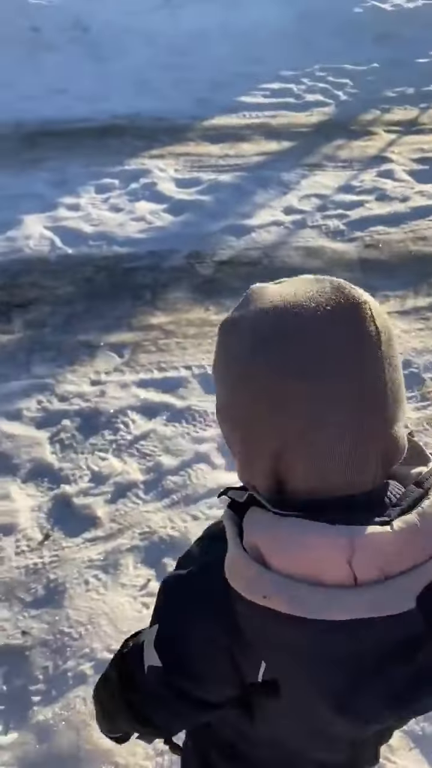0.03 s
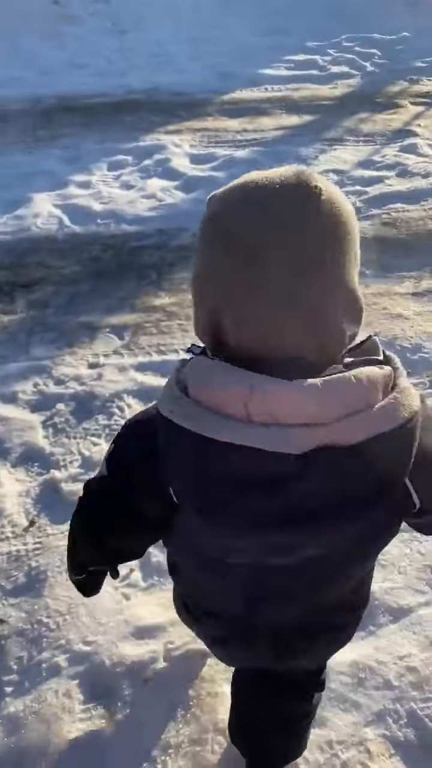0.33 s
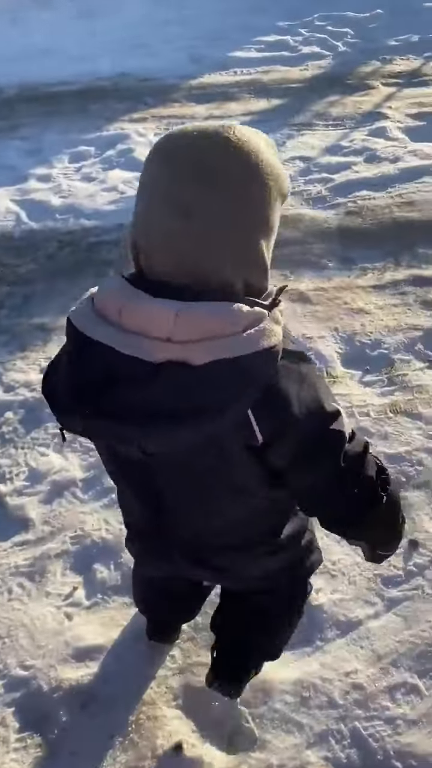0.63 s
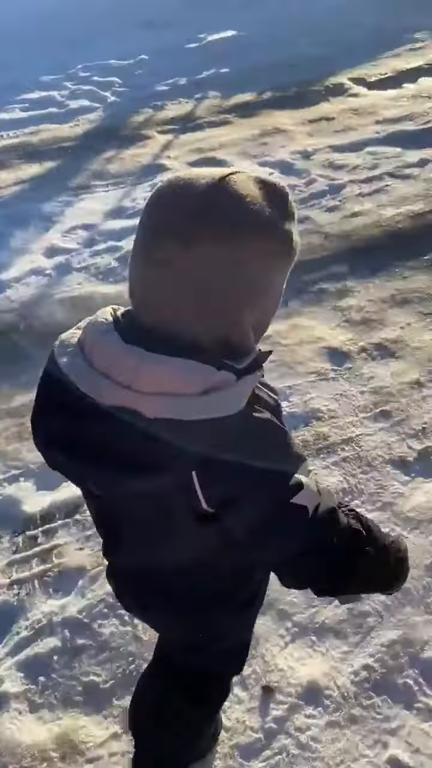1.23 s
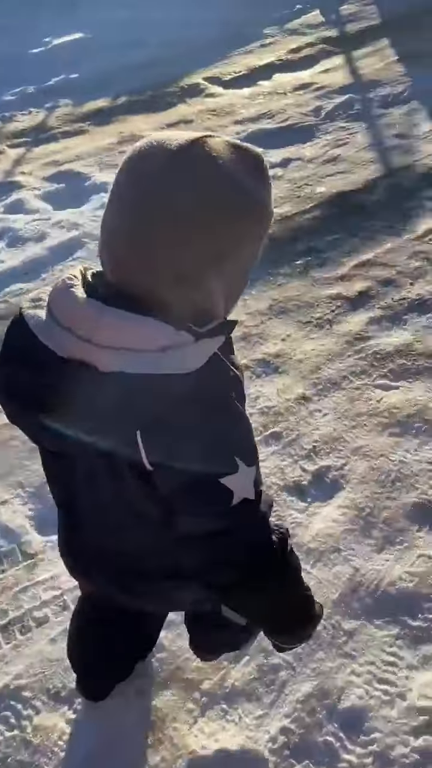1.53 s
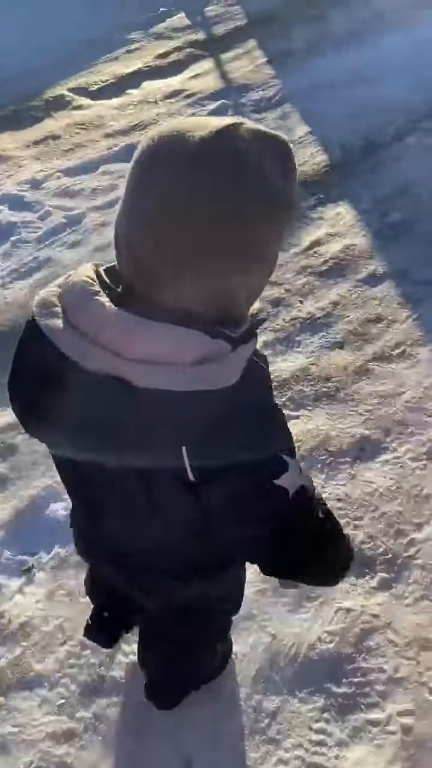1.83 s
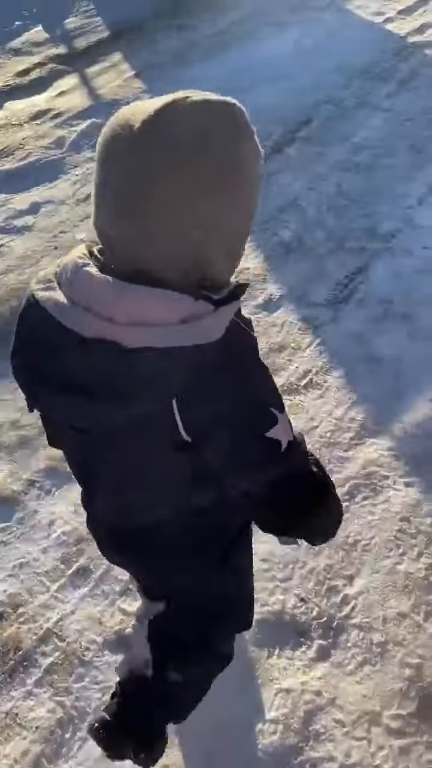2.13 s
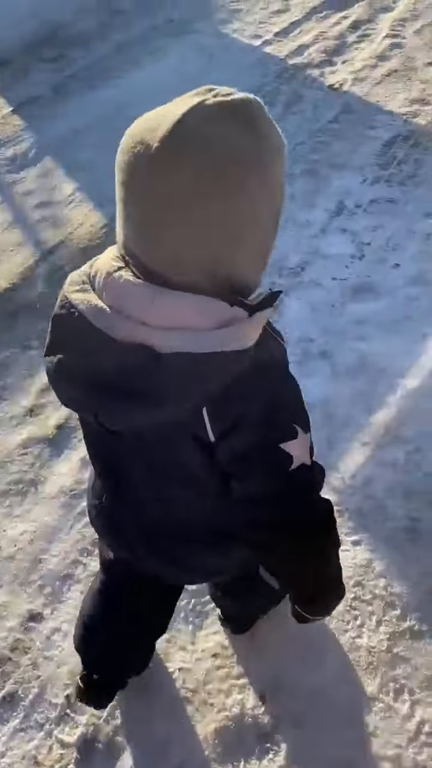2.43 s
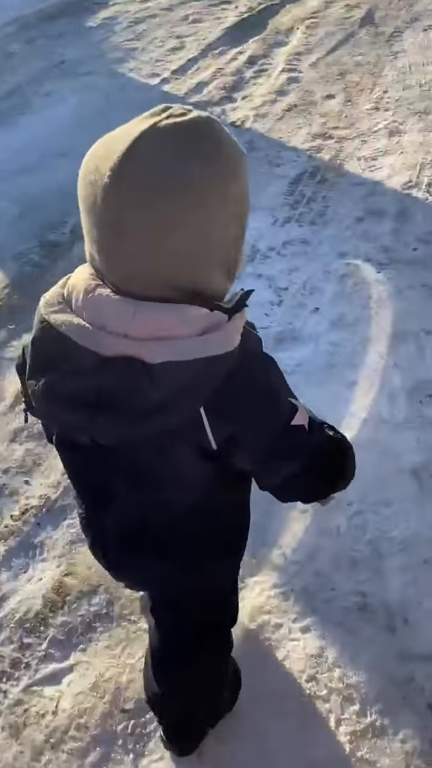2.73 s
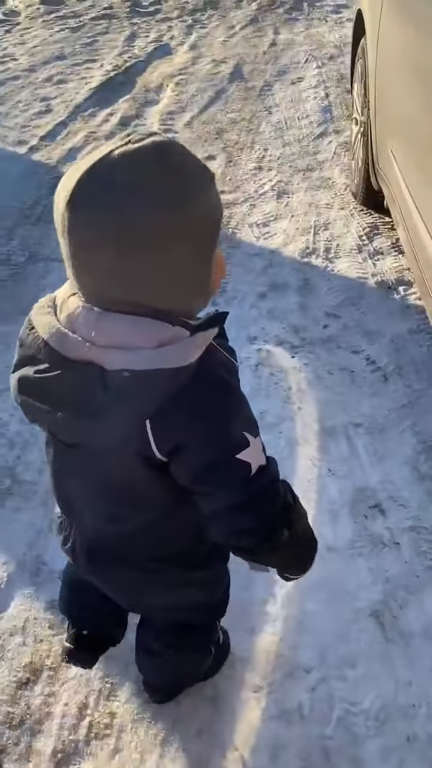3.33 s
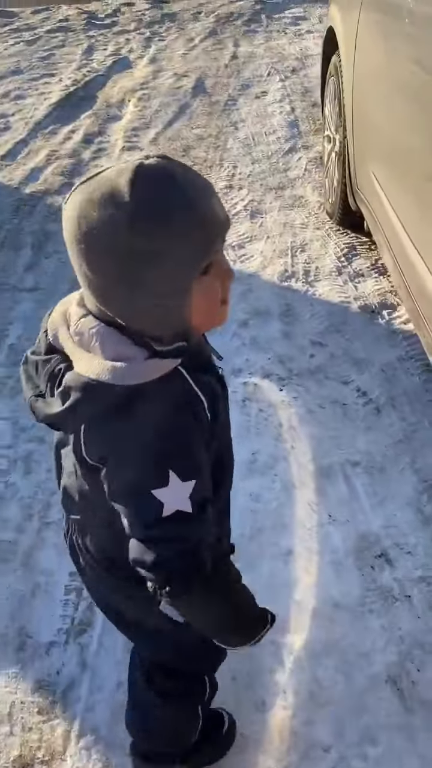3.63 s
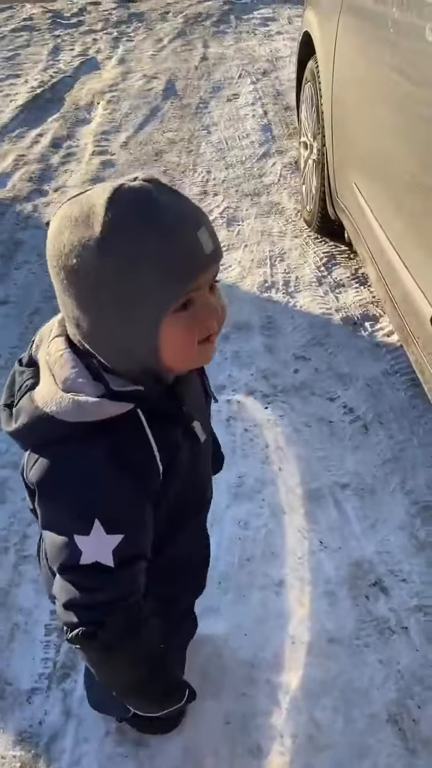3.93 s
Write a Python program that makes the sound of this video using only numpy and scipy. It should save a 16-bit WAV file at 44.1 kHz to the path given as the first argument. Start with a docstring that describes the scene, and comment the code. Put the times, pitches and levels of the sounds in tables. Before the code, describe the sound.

Crunchy, creaky footsteps of a small child on cold snow, with soft clothing rustle.

```python
"""Boots crunch on cold, packed snow: a small child is walking in a padded snowsuit.
Each boot thuds down and crushes grains. The snow creaks as the sole sticks and slips, ice crystals
tick as they shatter, and the icy crust snaps with short falling chirps. The suit swishes as its
fabric rubs. A low hum, like an idling engine, lies under the quiet outdoor air."""
import sys
import numpy as np
from scipy import signal
from scipy.fft import rfft, irfft, next_fast_len
from scipy.io import wavfile

SR = 44100
rng = np.random.default_rng(int(sys.argv[2]) if len(sys.argv) > 2 else 0)


def pcm_store(signal):
    """Save signal as 16-bit PCM."""
    levels = np.round(np.clip(np.atleast_2d(signal), -1, 1) * 32767)
    wavfile.write(sys.argv[1], SR, levels.astype(np.int16).T)


N = 176400
T = np.arange(N) / SR
FFT_SIZE = next_fast_len(N + SR // 4)
HZ = np.maximum(np.arange(FFT_SIZE // 2 + 1) * SR / FFT_SIZE, 1)

# Tone colour of the outdoor air: (frequency [Hz], relative level [dB])
AIR_COLOUR = [(20, -49), (45, 2), (90, -1), (150, -13), (400, -17), (1000, -18), (3000, -25.5), (6000, -54),
              (12000, -39.5)]
# The hum's slow changes: (time [s], pitch [Hz], level [dB])
HUM_PATH = [(0, 64, -56), (.11, 66.7, -43.5), (.8, 66.6, -47), (1, 66.6, -52.5), (1.4, 68.16, -49),
            (2.2, 68.1, -52.5), (2.801, 69.1, -52), (3.4, 69.1, -55), (4, 67.1, -59.5)]
# Tone colour of the rubbing fabric: (frequency [Hz], relative level [dB])
FABRIC_COLOUR = [(200, -24), (800, -6.5), (2000, -1.5), (3000, 1), (3900, -1.5), (4500, 1.5), (5400, 0.5),
                 (6500, -5), (8000, -6), (9500, -8), (11000, -9.5), (12000, -38)]
# Legs and sleeves rub: (start [s], peak [s], end [s], level [dB])
SUIT_SWISHES = [(0, 0.019, 0.1, -47), (0.188, 0.24, 0.27, -48), (0.298, 0.35, .35, -49.5),
                (0.372, 0.41, 0.56, -41), (0.808, 0.88, 0.95, -40.5), (0.958, 1.2, 1.44, -61.5),
                (1.162, 1.31, 1.352, -42), (1.461, 1.57, 1.62, -44.5), (1.593, 1.68, 1.73, -36.5),
                (1.736, 1.9, 2.11, -53), (2.016, 2.02, 2.17, -39), (2.207, 2.35, 2.3, -48),
                (2.364, 2.39, 2.503, -37), (2.765, 2.7, 2.91, -46), (2.913, 2.83, 3.1, -53.5),
                (3.11, 3.23, 3.14, -38), (3.15, 3.12, 3.206, -39), (3.3, 3.4, 3.7, -55),
                (3.511, 3.64, 3.696, -45.5), (3.88, 3.9, 4.8, -43.5)]
# Heel and sole land: (time [s], level [dB], pitch [Hz])
BOOT_THUDS = [(.096, -34, 158), (0.833, -33, 238), (1.097, -40, 94), (1.175, -36, 228), (1.599, -37, 263),
              (2.118, -32.5, 112), (2.167, -27, 189), (2.654, -32, 250), (2.735, -36.5, 274),
              (2.993, -41, 270), (3.116, -39, 111), (3.315, -41, 170), (3.528, -34, 298)]
# Ice crystals shatter: (time [s], relative level [dB])
ICE_TICKS = [(0.791, -27), (1.597, -24), (1.613, -29), (1.754, -28), (1.782, -27.5), (1.887, -28),
             (1.906, -28), (1.931, -25.5), (1.982, -23), (2.288, -29), (2.652, -27), (2.695, -30),
             (3.112, -17.5), (3.308, -28.5), (3.428, -37), (3.676, -29.5), (3.875, -26), (3.955, -22),
             (3.982, -25)]
# The sole sticks and slips: (start [s], peak [s], end [s], level [dB], pitch [Hz])
SNOW_CREAKS = [(0.313, .4, 0.48, -42.5, 993.4), (0.4, 0.36, 0.46, -40.5, 1320),
               (1.635, 1.648, 1.74, -41, 289), (2.027, 2.07, 2.18, -41, 680),
               (2.405, 2.4, 2.58, -47, 240.6), (2.853, 3.1, 2.89, -41.5, 3650),
               (3.875, 3.878, 3.905, -40.5, 819), (3.886, 3.87, 3.87, -43.5, 1503),
               (3.91, 3.8, 4, -40, 1072)]
# Tone colour of breaking snow: (frequency [Hz], gain [dB])
SNOW_COLOUR = [(100, 0.5), (200, 0.5), (330, 3), (600, 1.5), (1000, 2), (1500, -0.5), (2100, 2.5),
               (3000, -2), (5000, -0.5), (10000, -5)]
# The crust breaks: (time [s], relative level [dB], pitch [Hz])
CRUST_SNAPS = [(0.033, -30.5, 650), (.227, -37, 895), (.319, -32, 1200), (0.371, -31, 1250),
               (.468, -29, 1020), (.746, -33.5, 850), (.792, -31, 1620), (0.822, -30.5, 1430),
               (.987, -31, 1590), (1.128, -28.5, 785), (1.1744, -23.5, 740), (1.386, -34, 770),
               (1.405, -39, 880), (1.649, -29.5, 1210), (1.77, -31, 1010), (1.848, -37, 1430),
               (1.983, -27, 2550), (2.008, -31, 1488), (2.223, -31, 800), (2.341, -21, 4130),
               (2.58, -35.5, 790), (2.652, -23.5, 2530), (2.696, -21, 1927), (2.749, -27.5, 2012),
               (2.777, -27, 1615), (2.798, -26, 634), (2.843, -26.5, 600), (2.944, -29, 1900),
               (2.995, -24, 1170), (3.177, -29, 1100), (3.267, -33.5, 1600), (3.307, -20.5, 1640),
               (3.403, -30, 1683), (3.428, -31, 1813), (3.492, -30.5, 880), (3.675, -30, 985),
               (3.709, -32.5, 1511), (3.754, -37, 994), (3.983, -37, 1203)]
# A boot presses on the snow: (start [s], peak [s], end [s], level [dB], centre pitch [Hz])
BOOT_PRESSES = [(0, -0.005, 0.17, -43, 646), (0.205, 0, 0.28, -47.5, 910),
                (0.352, 0.473, 0.55, -42.5, 1240), (0.538, 0.2, 0.67, -56, 550),
                (0.727, 0.816, 0.78, -47.5, 453), (0.822, 0.8, 0.96, -43.5, 670),
                (0.97, 1.1, 1.05, -41, 790), (1.069, 0.8, 1.16, -44.5, 605),
                (1.196, 1.5, 1.339, -39.5, 880), (1.375, 1, 1.564, -46, 477), (1.563, 2.2, 1.734, -42, 565),
                (1.73, 1.3, 1.86, -48, 450), (1.837, 1.877, 2.005, -48.5, 530), (2.002, 2, 2.144, -39, 506),
                (2.156, 2.5, 2.415, -44, 514), (2.37, 2.5, 2.506, -40.5, 617), (2.506, 3, 2.63, -48.5, 527),
                (2.654, 3, 2.89, -44.5, 331), (2.77, 3, 2.95, -38.5, 1150), (2.94, 3.5, 3.42, -49.5, 1100),
                (3.111, 3, 3.215, -39, 610), (3.298, 3, 3.71, -46, 690), (3.576, 3.5, 3.67, -48, 946),
                (3.876, 4, 4.02, -42, 1288)]
# How alike left and right sound: (frequency [Hz], likeness [0 to 1])
STEREO_LIKENESS = [(250, .98), (500, .87), (800, .83), (1200, .64), (1550, .93), (2000, .98), (2250, .85),
                   (2600, .38), (3600, .4), (4000, .68), (4800, .55), (5400, .76), (6000, .43), (6500, .8),
                   (8000, .82), (9000, .5), (10000, .83), (11300, .93)]
# How far the left wave runs ahead of the right: (frequency [Hz], phase [radians])
LEFT_LEAD = [(200, 0), (550, -.83), (1000, -1), (1400, 0), (2200, .1), (2500, .8), (2750, 2.3), (3200, 2.3),
             (3800, .5), (4400, .95), (5100, .1), (5600, .3), (6000, 1.3), (6300, 3.1), (8200, 3.2),
             (8800, 4.2), (9050, 5.6), (9600, 2 * np.pi)]
# How much louder the left side is: (frequency [Hz], left minus right [dB])
LEFT_LOUDER = [(250, -.2), (520, -3.2), (800, -3.6), (1500, 0), (2000, 0), (2550, -2.8), (3050, 1.4),
               (3700, 1.4), (4250, -3), (4700, -3), (5400, 0)]


def from_db(db):
    """Turn decibels into a number to multiply by."""
    return 10 ** (np.asarray(db) / 20)


def unit_power(x):
    """Scale a signal to an average power of 1."""
    return x / np.sqrt(np.mean(x ** 2) + 1e-20)


def at_hz(table, hz=HZ):
    """Read between a table's rows, on a scale of octaves."""
    frequency, value = np.transpose(table)
    return np.interp(np.log(hz), np.log(frequency), value)


def bell(hz, centre, octaves):
    """A bell curve that favours frequencies near the centre."""
    return np.exp(-(np.log2(hz / centre) / octaves) ** 2 / 2)


def filtered(x, response):
    """Scale and delay each frequency as the response says."""
    return irfft(rfft(x, FFT_SIZE) * response, FFT_SIZE)[..., :N]


def drift(rate_hz):
    """A random wobble of size about 1, mostly slower than the rate."""
    return unit_power(filtered(rng.standard_normal(N), 1 / (1 + (HZ / rate_hz) ** 2)))


def add(out, time, sound):
    """Mix a sound in at a time in seconds."""
    i = max(int(time * SR), 0)
    out[..., i:i + sound.shape[-1]] += sound[..., :N - i]


def swell(start, peak, end, edge_db, fade_s):
    """Pressure is greatest at the middle of the three sorted times and fades outside start to end."""
    level_db = np.interp(T, np.sort([start, peak, end]), [-edge_db, 0, -edge_db])
    outside = np.maximum(start - T, 0) + np.maximum(T - end, 0)
    return from_db(level_db) * np.exp(-np.minimum(outside / fade_s, 20))


def clicks(per_s, spread_db):
    """Tiny clicks of uneven size at random times."""
    sizes = from_db(spread_db * np.minimum(rng.exponential(1, N), 4))
    return sizes * (rng.random(N) < per_s / SR)


def air():
    """Outdoor air is a faint, deep noise."""
    noise = rng.standard_normal((2, N))
    return from_db(-54) * unit_power(filtered(noise, from_db(at_hz(AIR_COLOUR))))


def hum():
    """One low tone wavers like an idling engine."""
    times, hz, db = np.transpose(HUM_PATH)
    loudness = from_db(np.interp(T, times, db) + 0.9 * drift(rate_hz=5))
    cycles = np.cumsum(np.interp(T, times, hz)) / SR
    out = np.zeros((2, N))
    out[0] = np.sqrt(2) * loudness * np.sin(2 * np.pi * cycles)
    return out


def suit():
    """Threads catch and slip by the thousand as the padded legs pass each other."""
    swish_power = sum((from_db(db) * swell(start, peak, end, edge_db=6.5, fade_s=0.0089)) ** 2
                      for start, peak, end, db in SUIT_SWISHES)
    catches = clicks(per_s=3500, spread_db=-1) * rng.choice([-1, 1], (2, N))
    catches *= from_db(drift(rate_hz=34))  # creases make the rubbing uneven
    bands, colour = np.geomspace(900, 10500, 9), from_db(at_hz(FABRIC_COLOUR))
    rub = 0
    for band in np.eye(len(bands)):
        folds = from_db(3.5 * drift(rate_hz=12.8))  # shifting folds favour one band, then another
        rub += filtered(catches, colour * np.interp(HZ, bands, band)) * folds
    standing_still = np.interp(T, [3.679, 3.78, 3.862, 3.873], [0, 1, 1, 0])
    rustle = from_db(-59 - 16 * standing_still)  # the suit settles when the child pauses
    return unit_power(rub) * np.sqrt(swish_power + rustle ** 2)


def thuds(rise_cycles=1.16, roughness=0.42):
    """The snow gives way unevenly under the boot, in one or two dull cycles."""
    out = np.zeros((2, N))
    for time, db, hz in BOOT_THUDS:
        cycles = T[:SR // 10] * hz
        rise = (cycles / rise_cycles) ** 2
        add(out[0], time, from_db(db) * rise * np.exp(1 - rise) * np.sin(2 * np.pi * cycles))
    return out * (1 + roughness * drift(rate_hz=250))


def ticks(decay_s=0.002):
    """An ice crystal shatters in a tiny, bright burst of noise."""
    out, t = np.zeros((2, N)), T[:SR // 20]
    for time, db in ICE_TICKS:
        burst = np.exp(-t / decay_s) * rng.standard_normal((2, len(t)))
        add(out, time, from_db(db) / 2 * burst)
    return filtered(out, bell(HZ, centre=5830, octaves=0.72))


def creaks(wander_hz=100, rough_db=4):
    """The sole sticks and slips on cold snow, making a rough tone with an unsteady pitch."""
    out = np.zeros((2, N))
    grip = unit_power(from_db(rough_db * drift(rate_hz=260)))
    for start, peak, end, db, hz in SNOW_CREAKS:
        cycles = np.cumsum(hz + wander_hz * drift(rate_hz=260)) / SR
        pressure = from_db(db) * swell(start, peak, end, edge_db=6, fade_s=0.004)
        out[0] += pressure * grip * np.sqrt(2) * np.sin(2 * np.pi * cycles)
    return out


def crust_chirp(x, lag_scale_s=0.003505):
    """High notes travel faster through the bending crust, so each click becomes a falling chirp."""
    slowness = np.sqrt(1000 / np.maximum(HZ, 120)) - np.sqrt(1000 / 3000)
    lag = lag_scale_s * slowness.clip(0)
    return filtered(x, np.exp(-2j * np.pi * np.cumsum(lag) * SR / FFT_SIZE))


def crust_hold(hold_s=0.012, dip_db=-1.5):
    """The crust bears the weight just before each snap, so the grains get a little quieter."""
    holds = [np.interp(T, [time - 2 * hold_s, time - hold_s, time, time + hold_s / 10], [0, 1, 1, 0])
             for time, _, _ in CRUST_SNAPS]
    return from_db(dip_db * np.max(holds, axis=0))


def snaps(boost_db=3, crumble_db=-22, crumble_s=0.0048):
    """The crust breaks with one sharp pulse, then crumbles for a few milliseconds."""
    out, size = np.zeros((2, N)), 2048
    t = (np.arange(size) - size // 4) / SR
    hz = np.maximum(np.arange(size // 2 + 1) * SR / size, 1)
    for time, db, pitch in CRUST_SNAPS:
        body = from_db(-2) / (1 + (hz / pitch / 2) ** 2)
        colour = (bell(hz, pitch, octaves=0.52) + body) * from_db(at_hz(SNOW_COLOUR, hz))
        fade = (t > 0) * np.exp(-np.abs(t) / crumble_s)
        crack = from_db(crumble_db) * rng.standard_normal((2, size)) * fade
        crack[0] += (t == 0) * rng.choice([-1, 1])  # the sharp pulse
        snap = irfft(rfft(crack) * colour) / irfft(colour)[0]
        add(out, time + t[0], from_db(db + boost_db) * snap)
    return out


def crunch(clump_db=1.78, ring_cycles=5.34, settling_db=-68):
    """Grains break in clumps under the boot; each rings briefly, around the pitch of that press."""
    breaks = clicks(per_s=1200, spread_db=2) * from_db(clump_db * drift(rate_hz=87))
    press_power = np.array([from_db(db) * swell(start, peak, end, edge_db=5, fade_s=0.0056)
                            for start, peak, end, db, _ in BOOT_PRESSES]) ** 2
    centres, pitches = np.array(BOOT_PRESSES)[:, 4], np.geomspace(130, 8000, 16)
    shares = bell(pitches[:, None], centres, octaves=1.28)
    shares /= shares.sum(0)  # each press shares its power among the pitches
    out = 0
    for hz, share in zip(pitches, shares):
        decay, angle = from_db(-60 * hz / (ring_cycles * SR)), 2 * np.pi * hz / SR
        kicks = breaks * rng.standard_normal((2, N)) + 1e-12 * T
        rings = signal.lfilter([1, 0, -1], [1, -2 * decay * np.cos(angle), decay ** 2], kicks)
        settling = share.mean() * from_db(settling_db) ** 2  # loose snow, heard between steps
        out += unit_power(rings) * np.sqrt(share @ press_power + settling)
    return filtered(out, from_db(at_hz(SNOW_COLOUR)))


def microphone(direct, scattered):
    """Two openings, each with its own delay and colour, hear direct sound alike, scattered opposed."""
    alike = np.clip(at_hz(STEREO_LIKENESS), 0, np.sqrt(0.98))
    sides = np.array([[1], [-1]])  # left, right
    colour = from_db(sides * at_hz(LEFT_LOUDER) / 2) * np.exp(1j * sides * at_hz(LEFT_LEAD) / 2)
    shared = filtered(direct, colour * np.sqrt((1 + alike) / 2))
    opposed = filtered(scattered, sides * colour * np.sqrt((1 - alike) / 2))
    return shared + opposed


def scene():
    """Mix the walk into stereo. Every source has two rows: direct sound and scattered sound."""
    snow = crust_chirp(crunch() * crust_hold() + snaps())
    direct, scattered = air() + hum() + suit() + thuds() + ticks() + creaks() + snow
    return microphone(direct, scattered)


def record(dry):
    """Cut the highest treble steeply."""
    cutoff_hz = 11900
    return filtered(dry, 1 / np.sqrt(1 + (HZ / cutoff_hz) ** 160))


dry = scene()
out = record(dry)
pcm_store(out)
```